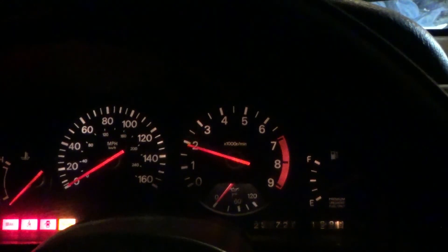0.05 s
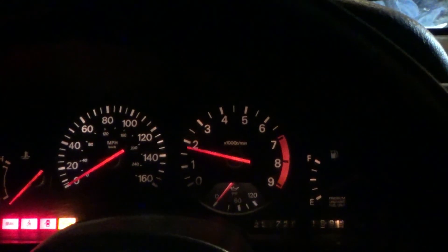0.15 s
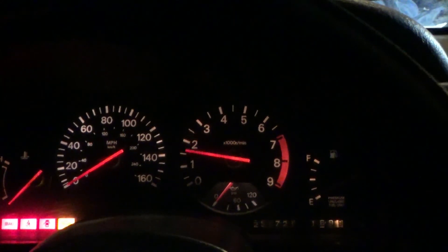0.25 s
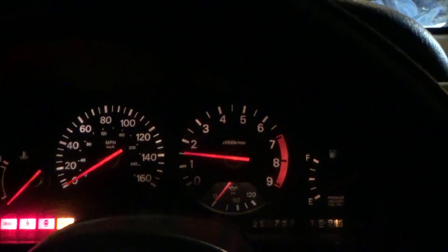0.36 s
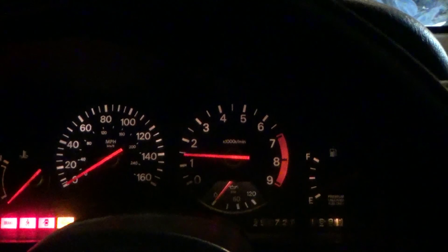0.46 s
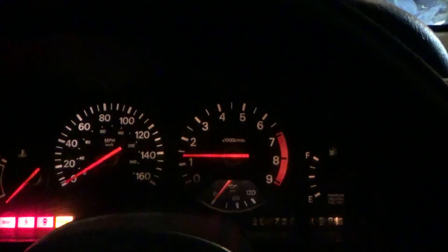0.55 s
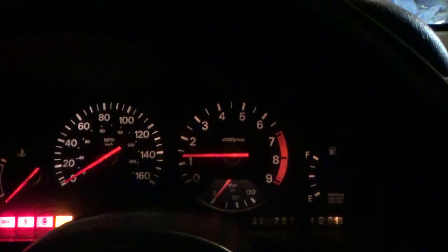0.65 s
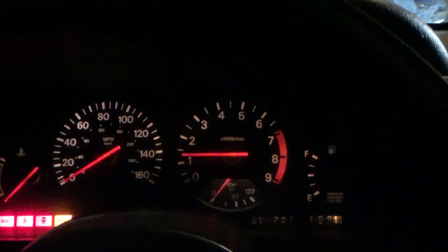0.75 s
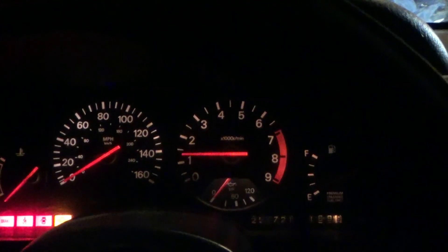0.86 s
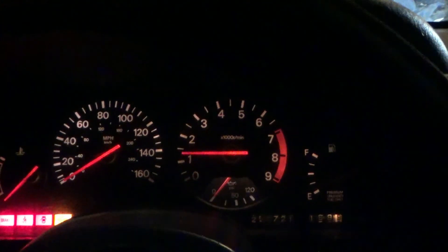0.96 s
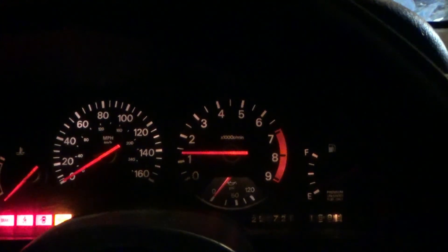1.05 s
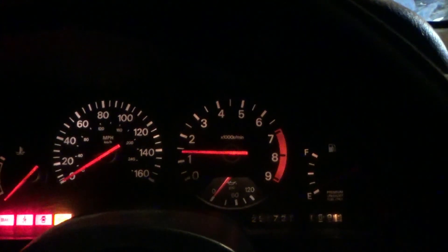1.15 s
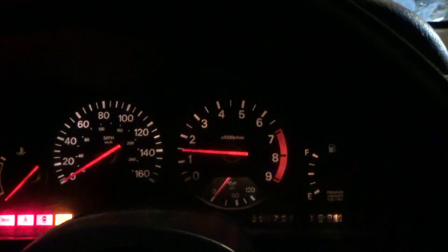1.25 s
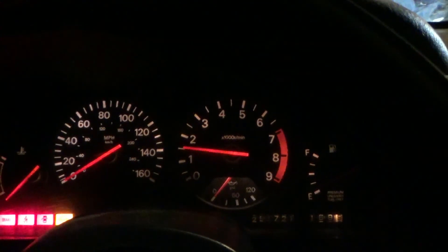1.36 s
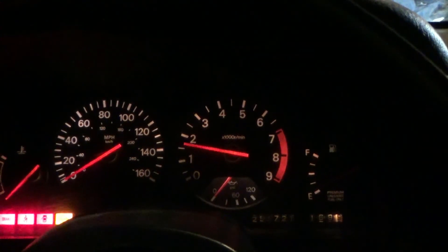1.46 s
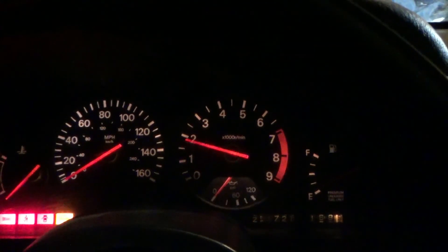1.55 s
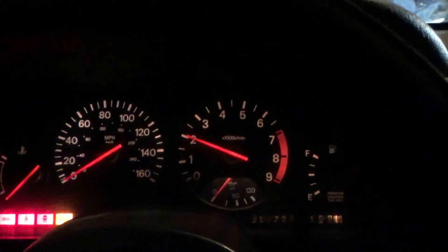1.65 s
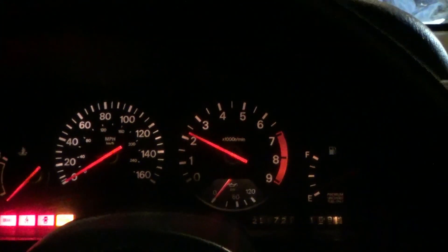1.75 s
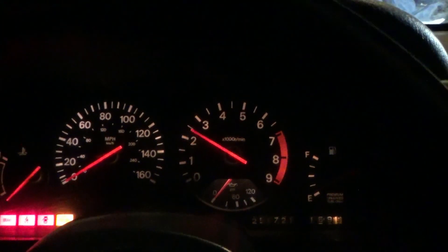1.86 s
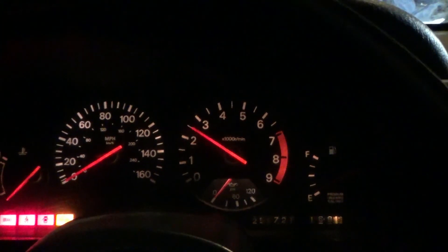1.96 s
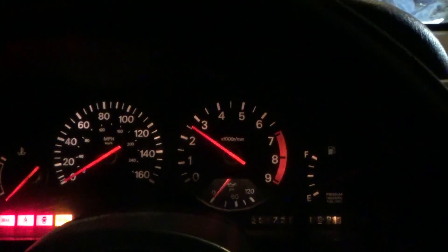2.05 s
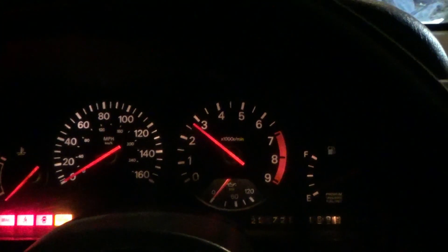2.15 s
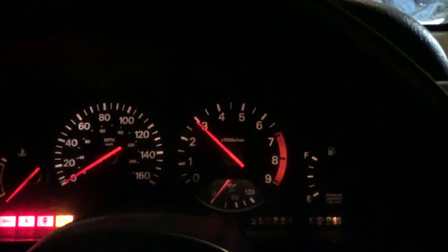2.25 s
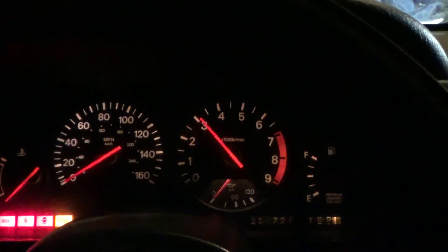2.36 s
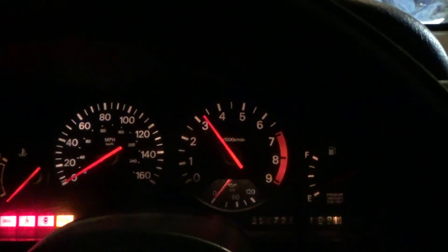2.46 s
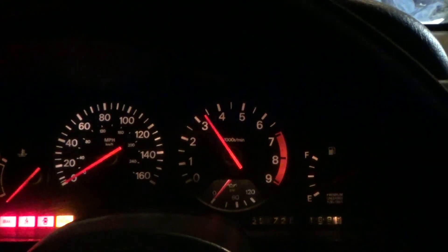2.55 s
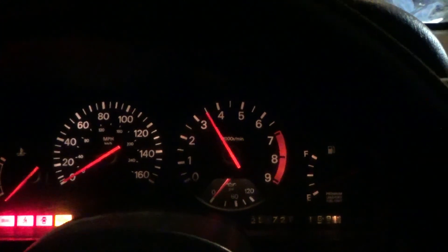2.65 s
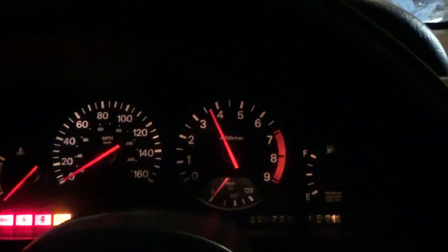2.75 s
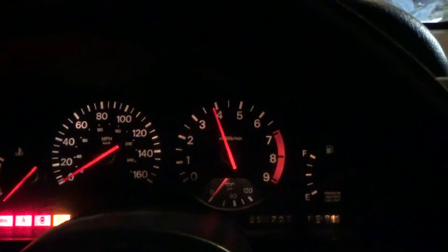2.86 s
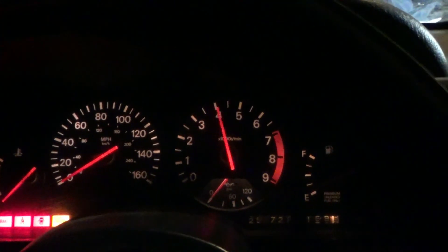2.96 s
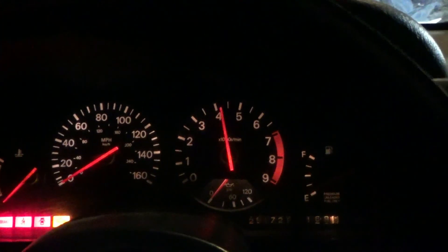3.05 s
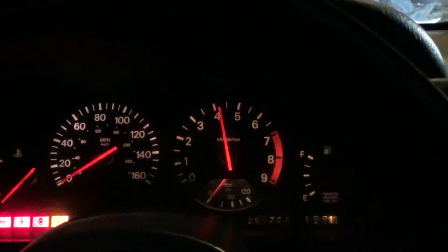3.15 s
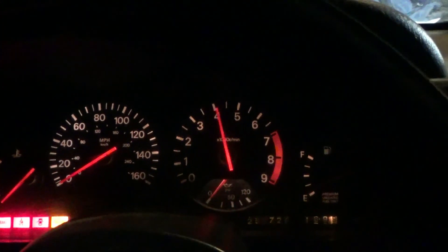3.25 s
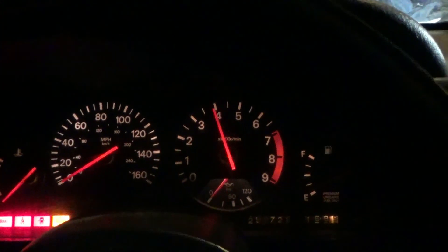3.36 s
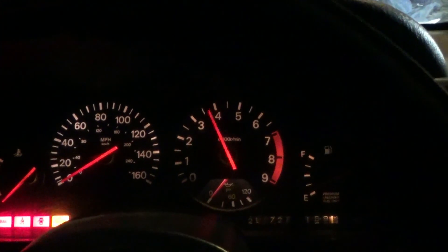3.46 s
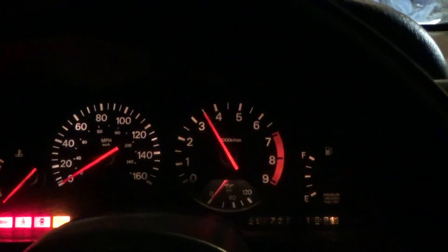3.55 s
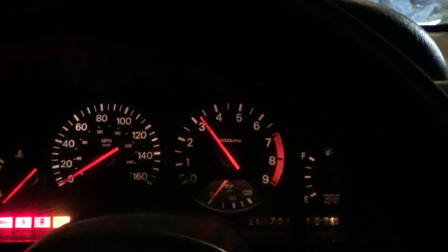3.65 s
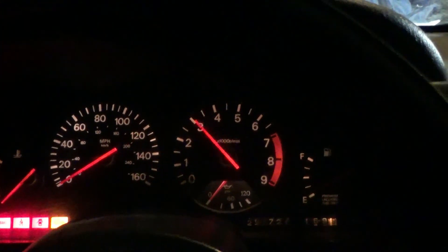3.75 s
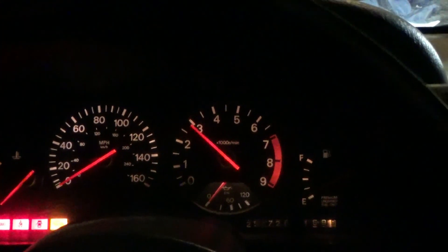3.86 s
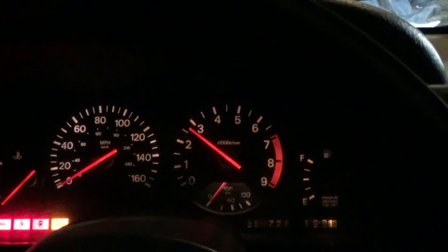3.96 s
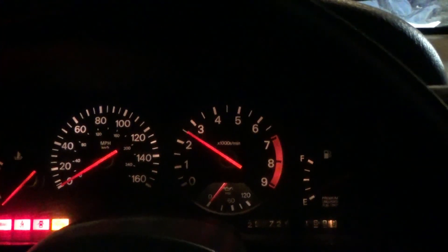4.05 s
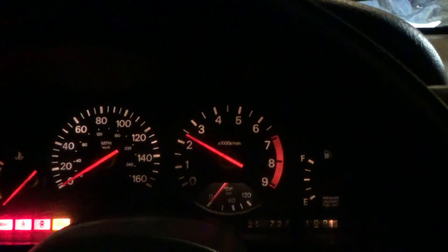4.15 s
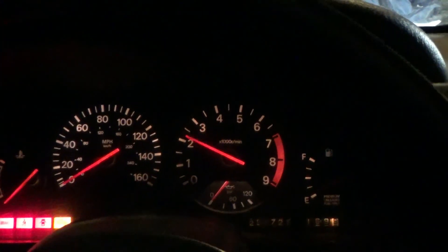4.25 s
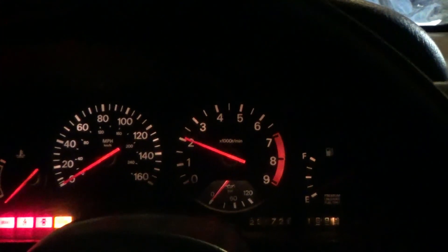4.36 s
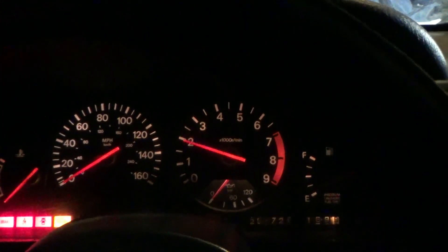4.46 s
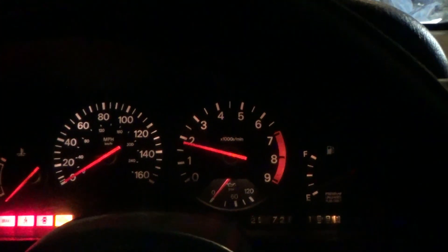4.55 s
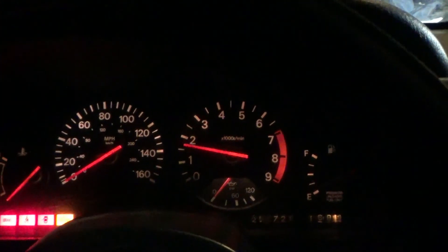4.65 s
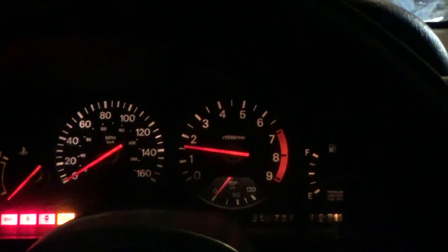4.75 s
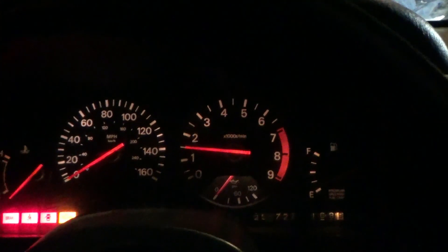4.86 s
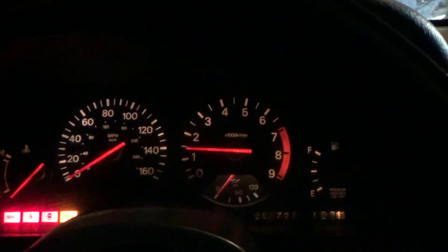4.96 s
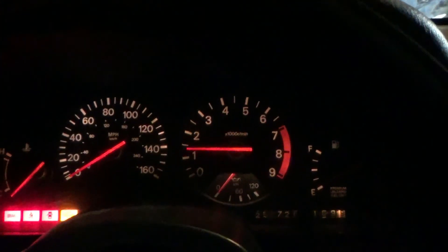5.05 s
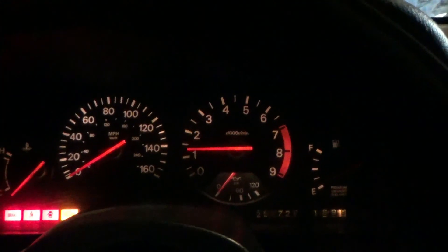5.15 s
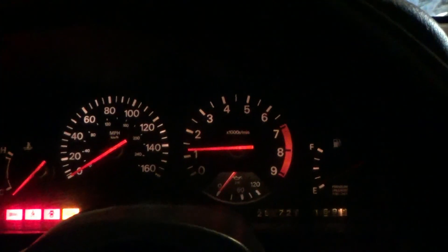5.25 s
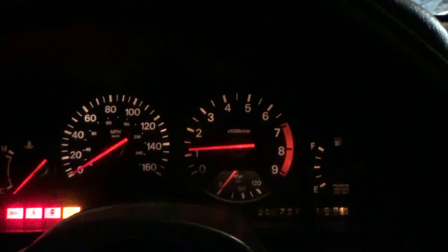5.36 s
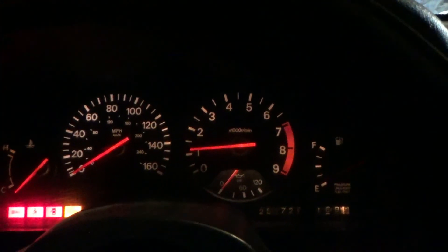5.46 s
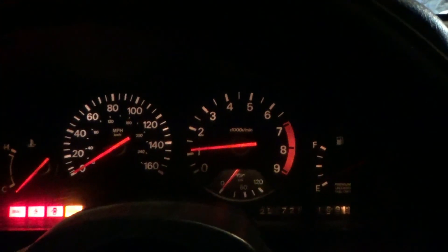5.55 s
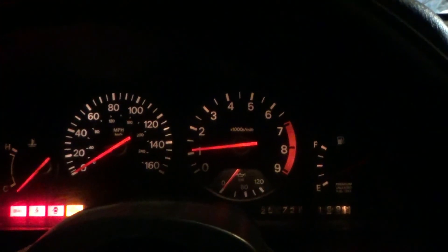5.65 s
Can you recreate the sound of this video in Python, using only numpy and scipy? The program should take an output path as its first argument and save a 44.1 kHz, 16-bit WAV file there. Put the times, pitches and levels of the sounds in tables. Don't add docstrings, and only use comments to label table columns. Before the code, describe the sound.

Inside a parked car, a small microphone catches the engine being revved in neutral. A low uneven drone sinks briefly, surges with gritty knocking and breathy hiss, eases and surges again in steps up to a peak, then is released. The remaining boom glides down in pitch, smoother and duller with faint clatter, ending as a slow throb. Short garage reflections thicken the bass.

```python
import sys
import numpy as np
from scipy import signal
from scipy.fft import rfft, irfft, next_fast_len
from scipy.io import wavfile
from scipy.ndimage import uniform_filter1d, map_coordinates

SR = 44100
rng = np.random.default_rng(int(sys.argv[2]) if len(sys.argv) > 2 else 0)


def volts_from_db(level):
    exponent = np.asarray(level, float) / 20
    return 10 ** exponent


def transcribe(signal):
    frames = np.atleast_2d(signal).T
    limited = np.clip(frames, -1, 1)
    pcm = np.round(limited * 32767).astype(np.int16)
    wavfile.write(sys.argv[1], SR, pcm)


N = 250913
T = np.arange(N) / SR

# [t/s, cycle rate f/Hz]
SPEED = [(0.0, 14.99), (0.443, 11.12), (0.639, 10.53), (0.834, 11.15), (0.975, 10.76), (1.24, 12.12),
         (1.478, 14.21), (1.909, 21.35), (2.031, 20.86), (2.453, 27.05), (2.595, 27.26), (2.949, 33.75),
         (3.067, 35.35), (3.649, 24.99), (4.254, 16.86), (4.738, 12.34), (5.139, 10.31), (5.69, 9.0)]
# [t/s, throttle opening 0-1]
PEDAL = [(0, 0.07), (0.431, 0), (.58, 0.76), (0.878, 0.67), (1.05, 0.52), (1.197, 0.53), (1.551, 0.88),
         (1.73, 0.71), (1.802, 0.35), (1.929, 0.4), (1.971, 1), (2.268, 1), (2.37, 0.3), (2.549, 0.54),
         (2.572, 0.81), (2.722, 1)]
# [t/s, throttle opening 0-1]
LIFT_OFF = [
    (2.99, .95),
    (3.06, 0),
]
# [place in cycle 0-1, pipe lag t/ms, blow under load level/dB, blow coasting level/dB, roar level/dB]
CYLINDERS = [(0.419, 2.5, 8.5, -0.5, 0.5), (0.589, 1.51, 6, -5, 0), (0.756, 2.07, 7.5, -4.5, 0),
             (0.919, 1.3, 4.5, -2, -4), (0.089, 2.7, -6.5, 7.5, -4.5), (0.253, 0.71, 2.5, 8, -13.5)]
# [under load level/dB, coasting level/dB]
LEAKS = [(9, -4), (10, -12), (5, -22), (8, -28), (0, -7), (-10, 0)]
# [under load level/dB, coasting level/dB]
NOTE_ORDERS = [(-2, -6.4), (3, -16), (-15, -7), (2.5, -6.5), (0, -3.4), (9, 3), (4.5, 1), (-2.3, -4),
               (6, -0.5), (-2.1, -4), (-0.5, -7.5), (5, 0.8), (-1.5, -14), (-4, -6), (4.2, -2.5),
               (-5.5, -20.5), (-15, -10), (3, -5.5), (-0.5, -11.5), (-2.9, -10), (1.6, -10), (-6, -9.5),
               (-5.5, -20), (-7.5, -16.5)]
# [cycle rate f/Hz, level/dB]
OVERRUN = [(9.2, 2), (10.5, -2.9), (13, -2.5), (15, -0.1), (20, 1), (24, 2), (32, 3.5)]
# [f/Hz, width f/Hz, left level/dB, right level/dB]
BOOMS = [(66.4, 9.5, -16.5, -21), (128.5, 19.2, -19.5, -27.5), (147.6, 7, -19, -28.5),
         (180.7, 16.4, -11, -21.5), (203.9, 16.8, -13, -22.5), (236, 26, -21, -33), (294, 49, -30.5, -37.5),
         (360.3, 50.5, -31, -37), (482, 59, -39.5, -43)]
HUM_ORDERS = [(6, 0), (3, 0), (12, 0), (8, 0), (3, 0), (10, 0)]
# [f/Hz, width f/Hz, level/dB]
HUM_RESONANCES = [(107.5, 9.4, -10), (96.2, 3.04, -17), (112.7, 10.7, -30), (181.3, 11, -23),
                  (60.9, 4.2, -20), (183, 8, -17.5)]
# [f/Hz, width f/Hz, level/dB]
PANELS = [(265, 63, -6.5), (384, 43, -3.7), (505, 52, -0.5), (653, 71, -2.5), (774, 52, -1.5),
          (931, 72, -5.5), (1124, 88, -16.5)]
# [f/Hz, level/dB]
CLATTER = [(500, -4.5), (900, 4), (1300, -2.5), (1500, -2), (2000, -6), (2400, -6), (3300, -11.5),
           (5000, -15.5), (9000, -12.5), (15000, -35)]
HISS = [(1500, -15), (3000, -14), (4500, -7), (6000, -5), (7200, -0.5), (8300, 1), (9500, -2.5),
        (11000, -7.5), (13000, -17.5), (15600, -34)]
RUMBLE = [(15, -23), (30, 11.5), (65, -16), (120, 11), (190, 7), (300, 0), (600, -10.5), (1200, -48),
          (3000, -52)]
# [f/Hz, level/dB]
GAS = [(200, -65), (350, -10.5), (1100, -12.5), (1500, -12)]
# [f/Hz, left minus right level/dB]
TILT = [(60, 11), (110, 4), (200, -2.5), (380, 2.5), (700, 5.5), (1290, 2.5), (2380, 1), (4400, 2.5),
        (8120, -1.5), (15000, 2)]
# [f/Hz, left-right likeness 0-1]
ALIKE = [(60, 0.32), (500, 0.52), (1400, 0.5), (4000, 0.44), (8000, 0.6), (15000, 0.77)]
# [f/Hz, decay by 60 dB t/s]
REVERBERATION = [(60, 1), (300, 0.42), (1000, 0.2), (5000, 0.026)]

CRANK_START = 0.59
FLYWHEEL_S = 0.08
INTAKE_FILL_S = 0.116
CATCH_S = 0.06
FUEL_RUNS_ON_S = 0.08
FULL_LOAD_AT = 0.09
IDLE_HZ, ROAR_FULL_HZ = 10, 18
ROAR_IDLE_DB, ROAR_DB_PER_HZ, ROAR_OPEN_DB = -40.5, 0.38, -20
HISS_IDLE_DB, HISS_DB_PER_HZ, HISS_OPEN_DB = -58, -0.47, -37.5
CLATTER_IDLE_DB, CLATTER_DB_PER_HZ, CLATTER_OPEN_DB = -44, 0.46, -32.5
ROAR_POWER, ROAR_THINS_DB_PER_HZ = 0.99, -0.02
KNOCK_IDLE, KNOCK_PER_HZ, KNOCK_LOADED, KNOCK_FADES_PER_HZ = 0.3, 0.024, 0.7, 0.008
GAS_SHARE, GAS_PER_HZ = 0.62, 0.011
KNOCK_HZ = 1300
BOOM_LOADED_DB = -1
RUMBLE_LOADED_DB, RUMBLE_COAST_DB = -28, -35
WAVER_DB, WAVER_PER_S = 1.8, 9
COARSE = 8
MIC_LOW_HZ = 27


def unit(x):
    return x / np.sqrt(np.mean(x ** 2) + 1e-20)


def along(points, hz):
    f, v = np.transpose(points)
    return np.interp(np.log(hz + 1), np.log(f + 1), v)


def curve(rows):
    seconds, values = np.transpose(rows)
    return np.interp(T, seconds, values)


def wobble(rate):
    knots = rng.standard_normal(int(N * rate / SR) + 4)
    return map_coordinates(knots, [T * rate])


def filtered(x, response):
    m = next_fast_len(N + SR // 2)
    return irfft(rfft(x, m) * response(np.fft.rfftfreq(m, 1 / SR)), m)[..., :N]


def modes(rows, column):
    def response(f):
        total = 0
        for k, row in enumerate(rows):
            centre, width = row[:2]
            resonance = 1j * f * width / (centre ** 2 - f * f + 1j * f * width)
            total = total + (-1) ** k * volts_from_db(row[column]) * resonance
        return total
    return response


def softened(x, hz):
    return filtered(x, lambda f: (1 + 1j * f / hz) ** -3)


def steady(x, seconds):
    power = np.mean(np.atleast_2d(x), 0) ** 2
    for _ in range(2):
        power = np.abs(uniform_filter1d(power, max(int(seconds * SR), 1)))
    return x / np.sqrt(power + 1e-12)


def loaded_or_coasting(load, loaded, coasting):
    return load * loaded + (1 - load) * coasting


def garage(x):
    hz, t, z = signal.stft(rng.standard_normal((2, SR // 2)), SR, nperseg=1024)
    decay = volts_from_db(-60 * t / along(REVERBERATION, hz)[:, None])
    tail = signal.istft(z * decay, SR, nperseg=1024)[1]
    return signal.fftconvolve(x, tail / np.linalg.norm(tail[0]), axes=1)[:, :N]


def rush(spectrum):
    def mid_side(hz):
        turn = np.arccos(np.clip(along(ALIKE, hz), -1, 1)) / 2
        return volts_from_db(along(spectrum, hz)) * np.array([np.cos(turn), np.sin(turn)])

    mid, side = filtered(rng.standard_normal((2, N)), mid_side)
    pair = np.array([mid + side, mid - side])
    pair = filtered(pair, lambda hz: volts_from_db(along(TILT, hz) / 2 * [[1], [-1]]))
    return pair / np.std(pair.mean(0))


def throttle():
    air = curve(PEDAL + LIFT_OFF)
    first_push = [(PEDAL[1][0] + INTAKE_FILL_S, 0), (PEDAL[2][0] + CATCH_S, PEDAL[2][1])]
    late_lift = [(s + FUEL_RUNS_ON_S, v) for s, v in LIFT_OFF]
    burn = curve(first_push + PEDAL[3:] + late_lift)
    return np.clip(air, 0, None), np.clip(burn, 0, None)


def breath(cycle, speed, levels_db, sharp, even_hz):
    flow = 0
    for row, db in zip(CYLINDERS, levels_db):
        phase = 2 * np.pi * (cycle - row[0] - 0.06)
        flow = flow + volts_from_db(db) * np.exp(sharp * (np.cos(phase) - 1))
    depth = 1 / (1 + (speed / even_hz) ** 4)
    return steady(flow ** depth, 0.26)


def leakage(cycle, speed, air):
    sucking = np.clip(air / FULL_LOAD_AT, 0, 1)
    levels = [loaded_or_coasting(sucking, on, off) for on, off in LEAKS]
    return breath(cycle, speed, levels, sharp=6.5, even_hz=19)


def rumble(load):
    return volts_from_db(loaded_or_coasting(load, RUMBLE_LOADED_DB, RUMBLE_COAST_DB)) * rush(RUMBLE)


def clatter(speed, air, leak):
    idle = volts_from_db(CLATTER_IDLE_DB + CLATTER_DB_PER_HZ * (speed - IDLE_HZ))
    opened = volts_from_db(CLATTER_OPEN_DB) * air * np.minimum(speed / ROAR_FULL_HZ, 1)
    flutter = volts_from_db(0.48 * wobble(30) + 1.265 * wobble(200))
    return np.hypot(idle, opened) * flutter * rush(CLATTER) * leak ** 0.15


def hiss(speed, air, leak):
    idle = volts_from_db(HISS_IDLE_DB + HISS_DB_PER_HZ * (speed - IDLE_HZ))
    flutter = volts_from_db(1.6 * wobble(24.52) + 1.6 * wobble(120))
    return np.hypot(idle, volts_from_db(HISS_OPEN_DB) * air) * flutter * leak * rush(HISS)


def firings(cycle, scatter_db, jitter_ms):
    train = np.zeros(N)
    for place, lag_ms, _, _, roar_db in CYLINDERS:
        when = np.interp(np.arange(int(cycle[-1])) + place % 1, cycle, T)
        chance = rng.standard_normal((len(when), 2))
        arrival = when + (lag_ms + jitter_ms * chance[:, 0]) / 1000
        spot = np.clip(arrival * SR, 0, N - 1).astype(int)
        train[spot] += volts_from_db(roar_db + scatter_db * chance[:, 1])
    return train


def panel_knocks(cycle):
    knocks = filtered(firings(cycle, scatter_db=1.5, jitter_ms=0.07), modes(PANELS, column=2))
    knocks = softened(knocks, KNOCK_HZ) * volts_from_db([[2.8], [-2.8]])
    return steady(knocks + volts_from_db(-14) * garage(knocks), 0.33)


def manifold_gas(cycle, speed):
    gas = unit(filtered(rush(GAS), modes(PANELS, column=2)))
    return gas * breath(cycle, speed, [row[4] for row in CYLINDERS], sharp=2.3, even_hz=26.9)


def roar(cycle, speed, load, burn):
    over = speed - IDLE_HZ
    idle = volts_from_db(ROAR_IDLE_DB + ROAR_DB_PER_HZ * over)
    thinning_db = ROAR_THINS_DB_PER_HZ * np.maximum(speed - ROAR_FULL_HZ, 0)
    opened = volts_from_db(ROAR_OPEN_DB - thinning_db) * burn ** ROAR_POWER * np.minimum(speed / ROAR_FULL_HZ, 1)
    knock_share = loaded_or_coasting(load, KNOCK_LOADED - KNOCK_FADES_PER_HZ * over,
                                     KNOCK_IDLE + KNOCK_PER_HZ * over)
    gas_share = GAS_SHARE - (1 - load) * GAS_PER_HZ * over
    mix = knock_share * panel_knocks(cycle) + gas_share * manifold_gas(cycle, speed)
    return np.hypot(idle, opened) * mix


def hums(cycle, speed, load):
    total = 0
    for (order, loaded), (hz, width, db) in zip(HUM_ORDERS, HUM_RESONANCES):
        active = loaded_or_coasting(load, loaded, 1 - loaded)
        swell = 1 / (1 + ((order * speed - hz) / width) ** 4)
        total = total + volts_from_db(db) * active * np.sin(2 * np.pi * order * cycle) * swell
    return total * volts_from_db([[2.5], [-3.5]])


def exhaust_note(cycle, load):
    place, _, loaded_db, coast_db, _ = np.transpose(CYLINDERS)
    cycle, load, t = cycle[::COARSE], load[::COARSE], T[::COARSE]
    turn, spin, out = np.exp(2j * np.pi * cycle), 1, 0
    orders = NOTE_ORDERS + NOTE_ORDERS[-6:] * 3
    for k, (on_db, off_db) in enumerate(orders, 1):
        blows = np.exp(-2j * np.pi * k * place)
        on = volts_from_db(on_db) * np.exp(1j * np.angle(volts_from_db(loaded_db) @ blows))
        off = volts_from_db(off_db) * np.exp(1j * np.angle(volts_from_db(coast_db) @ blows))
        spin = spin * turn
        knots = volts_from_db(WAVER_DB * rng.standard_normal(100))
        waver = np.interp(t * WAVER_PER_S, np.arange(len(knots)), knots)
        out = out + waver * (spin * loaded_or_coasting(load, on, off)).real
    return signal.resample_poly(out, COARSE, 1)[:N]


def exhaust_boom(cycle, speed, load):
    boom_db = loaded_or_coasting(load, BOOM_LOADED_DB, along(OVERRUN, speed))
    blows = volts_from_db(boom_db) * exhaust_note(cycle, load)
    pipe = np.array([filtered(blows, modes(BOOMS, column=side)) for side in (2, 3)])
    return pipe + volts_from_db(-22) * garage(pipe)


def scene():
    speed = uniform_filter1d(curve(SPEED), int(FLYWHEEL_S * SR), mode='nearest')
    cycle = CRANK_START + np.cumsum(speed) / SR
    air, burn = throttle()
    load = np.clip(burn / FULL_LOAD_AT, 0, 1)
    leak = leakage(cycle, speed, air)
    noise = rumble(load) + clatter(speed, air, leak) + hiss(speed, air, leak)
    tones = hums(cycle, speed, load) + exhaust_boom(cycle, speed, load)
    return noise + roar(cycle, speed, load, burn) + tones


def roll_off(x):
    return signal.sosfilt(signal.butter(12, 15610, fs=SR, output="sos"), x)


def record(dry):
    dry = filtered(dry, lambda hz: (1j * hz / (MIC_LOW_HZ + 1j * hz)) ** 2)
    soft = dry / (1 + np.abs(dry) ** 6) ** (1 / 6)
    return roll_off(soft)


dry = scene()
out = record(dry)
transcribe(out)
```